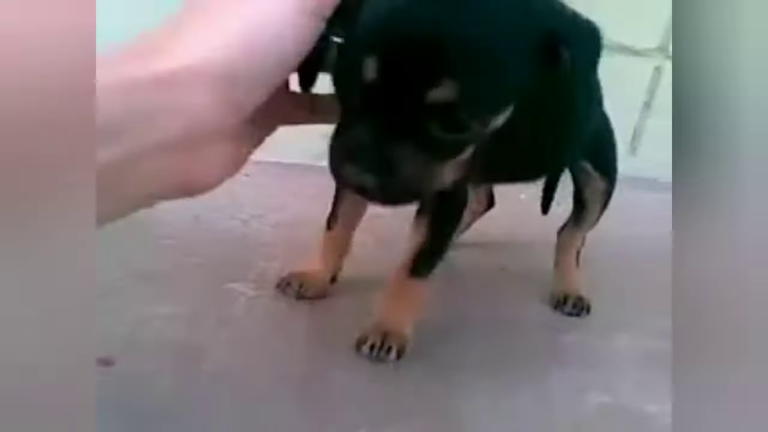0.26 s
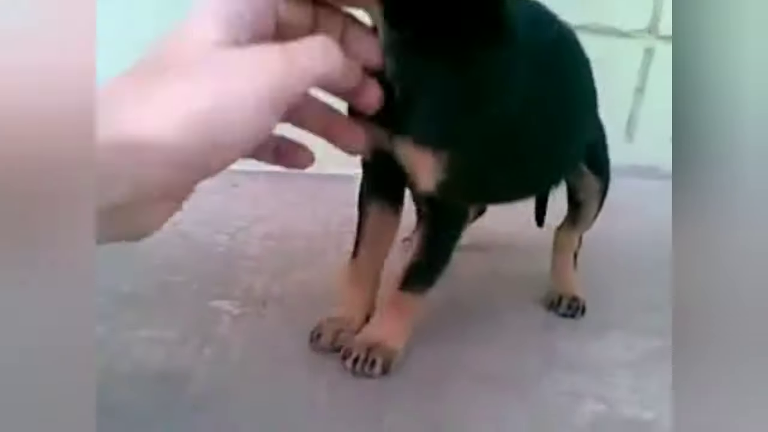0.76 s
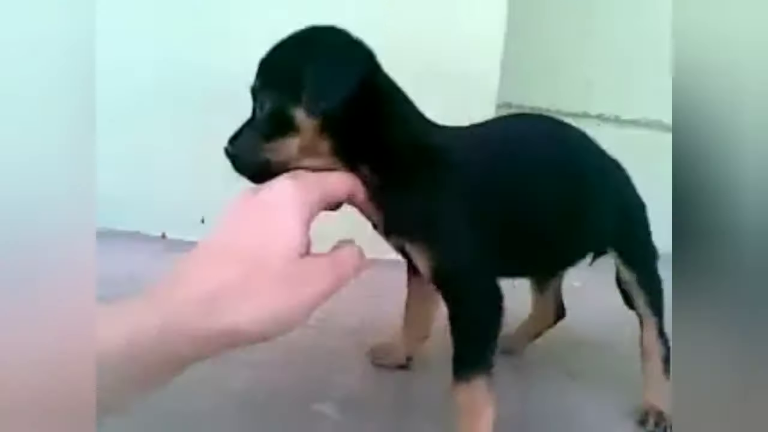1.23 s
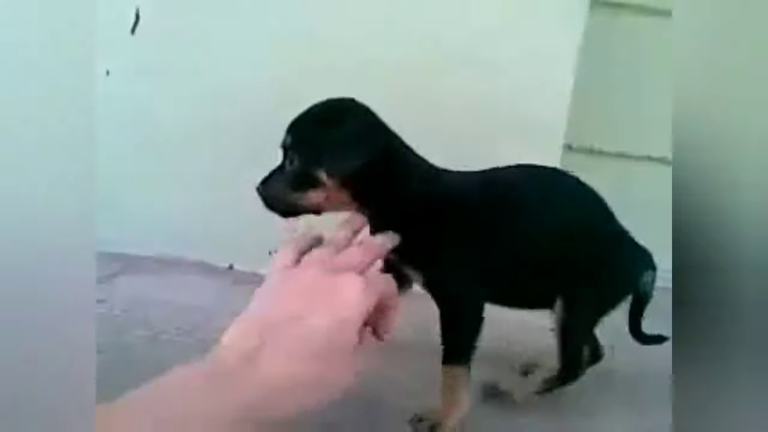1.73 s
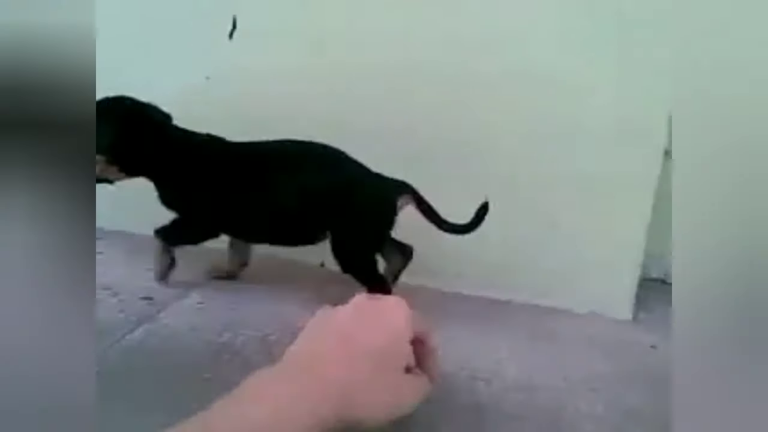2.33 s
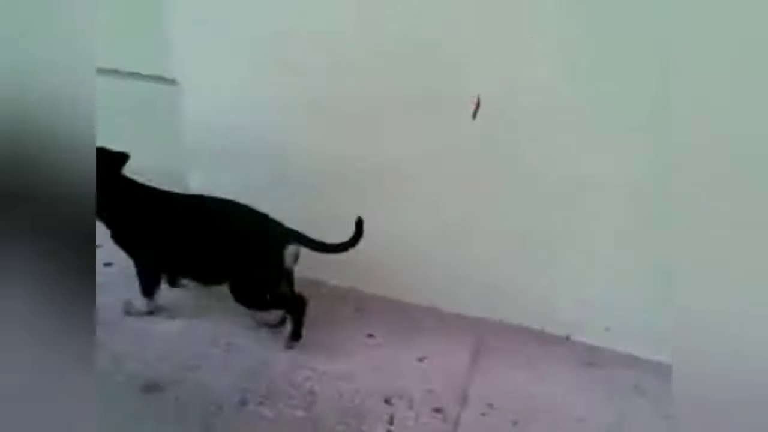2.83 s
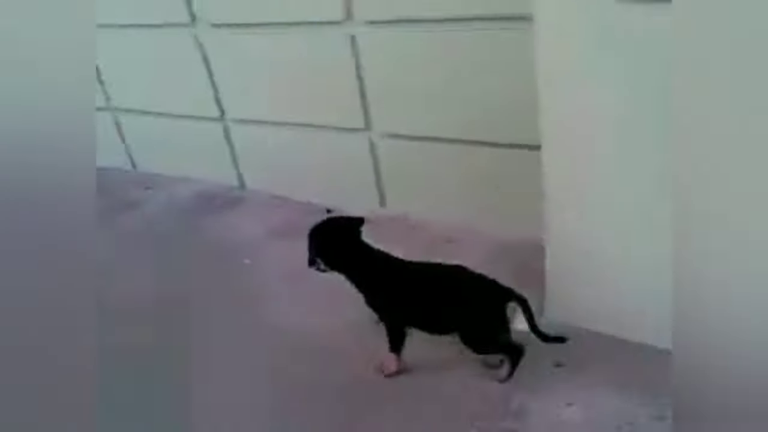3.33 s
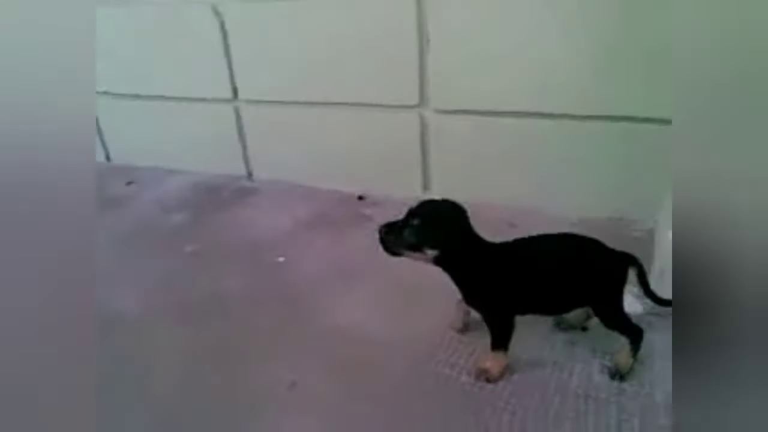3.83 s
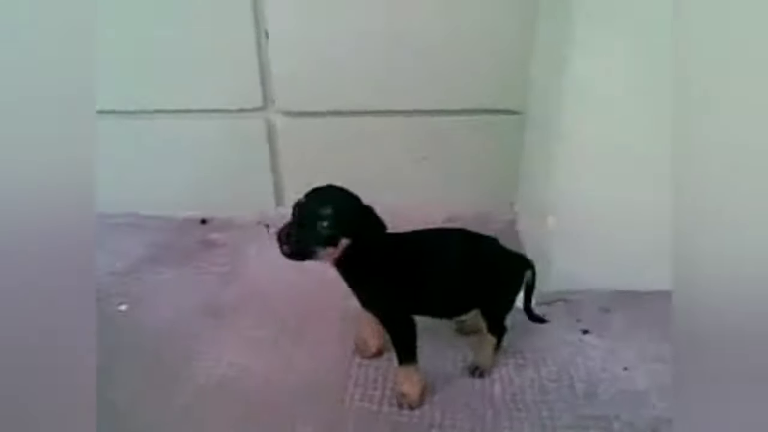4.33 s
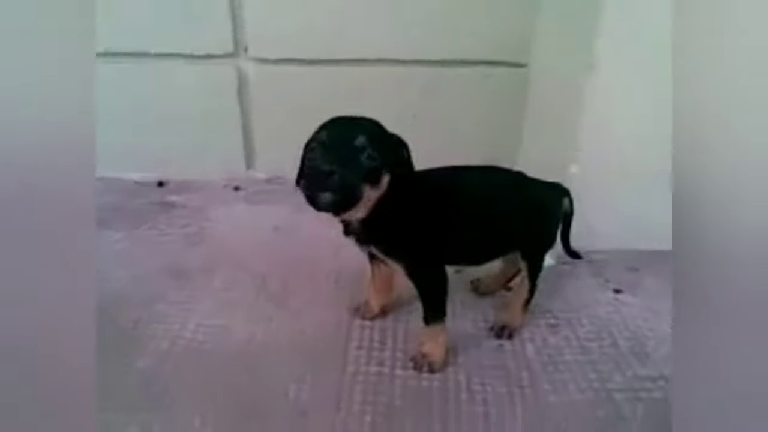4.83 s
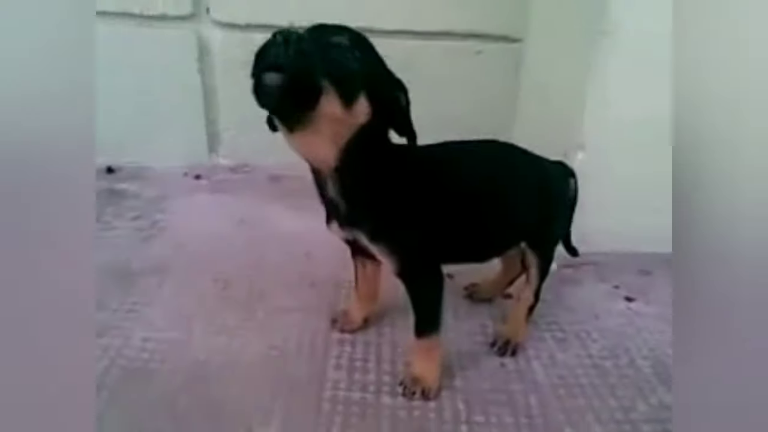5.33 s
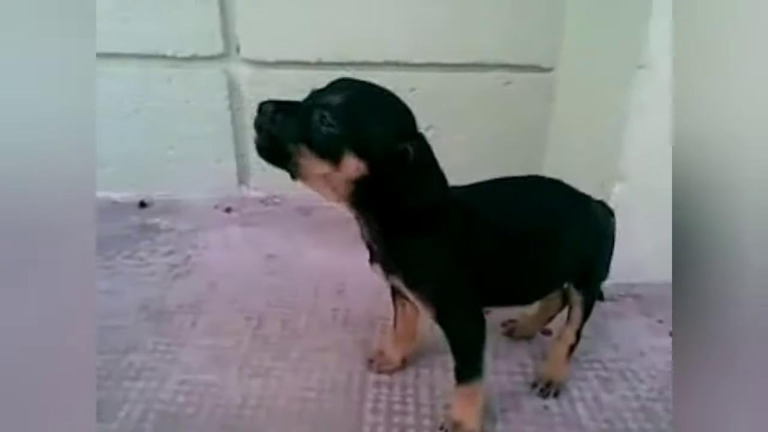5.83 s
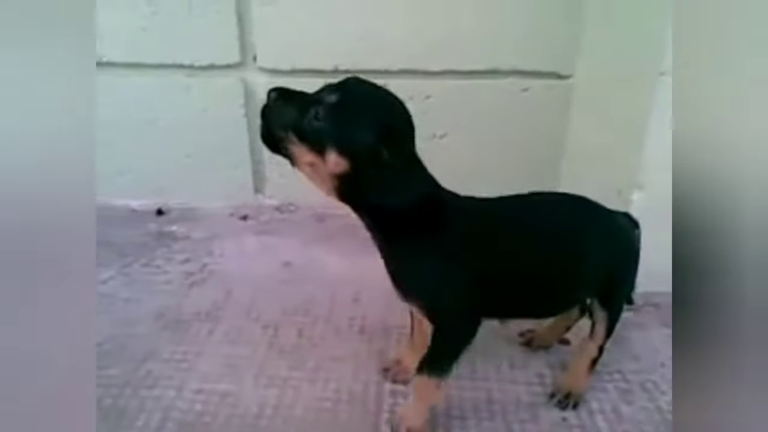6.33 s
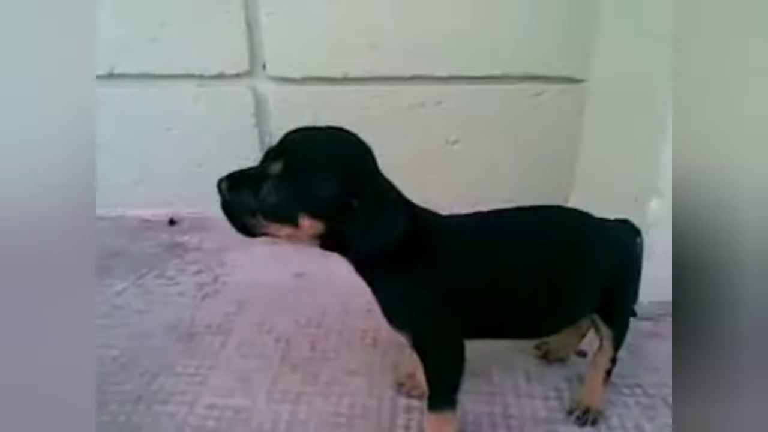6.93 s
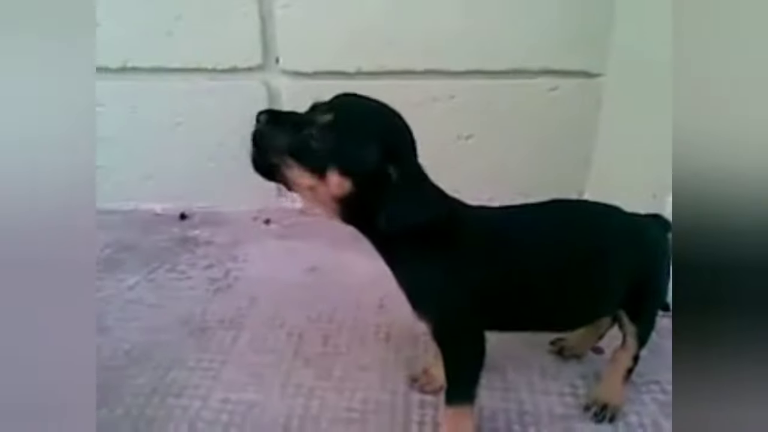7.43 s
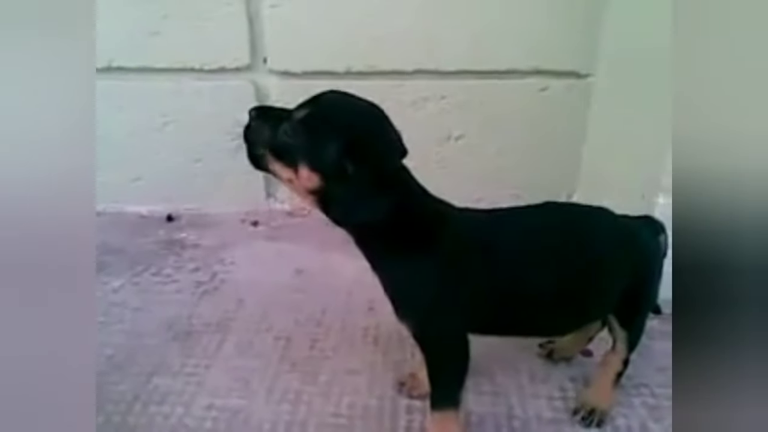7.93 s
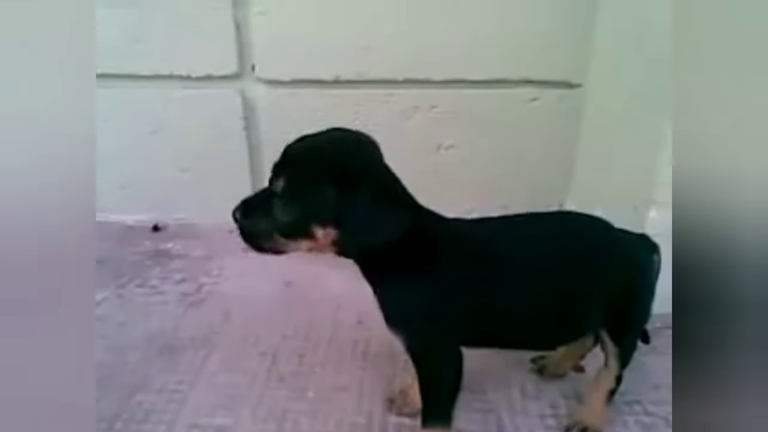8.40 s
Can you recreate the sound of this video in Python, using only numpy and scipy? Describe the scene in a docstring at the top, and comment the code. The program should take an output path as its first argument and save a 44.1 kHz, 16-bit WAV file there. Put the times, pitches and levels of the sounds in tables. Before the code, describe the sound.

A puppy a step away, by a wall, gives short, high whines and small whimpers. It yelps twice, then holds three long, whistle-like whines that sink slowly in pitch, and ends with a whimper and a shorter whine. A few faint taps and scuffs come around the yelps. Other dogs bark hoarsely far off in the echoing building throughout, over a low rumble and a motor's hum.

```python
"""Over a low rumble and a motor's hum, a puppy whines on a concrete floor by a wall, a step away.
It goes on to whimper, yelp and hold long notes: its vocal folds give a thin, nearly pure whistle,
and its muzzle colours a faint sheen of high overtones. Other dogs bark far off in the echoing
building. There are short taps and scuffs, a mouth click, and a hand rubbing the fur under its chin."""
import sys
import numpy as np
from scipy import signal
from scipy.fft import rfft, irfft, next_fast_len
from scipy.io import wavfile
from scipy.ndimage import uniform_filter1d, map_coordinates

SR = 44100
rng = np.random.default_rng(int(sys.argv[2]) if len(sys.argv) > 2 else 0)


def unload_wav(signal):
    """Save mono or channel-first audio to the path in sys.argv[1] as 16-bit WAV at rate SR, clipped to [-1, 1]."""
    wavfile.write(
        sys.argv[1],
        SR,
        np.round(np.clip(np.atleast_2d(signal).T, -1, 1) * 32767).astype(np.int16),
    )


N = 381906
TOP_HZ = 10900  # upper band limit

# level of the background hiss and hum, which sinks during the long whines: t/s, level/dB
BACKGROUND_LEVEL = [(0, -42.5), (1.1, -45), (1.35, -42), (2.9, -43.5), (4.5, -47), (5.7, -48), (6.7, -45),
                    (8.1, -47), (8.66, -43.5)]
# mouth resonances that the third harmonic slides through: f/Hz, gain/dB
THIRD_FORMANTS = [(2000, -11), (2150, -13.5), (2270, -9.5), (2430, -23), (2620, -15.5), (2670, -8.5),
                  (2725, -25.5), (3100, -29), (3260, -20), (3600, -26.5)]


def amp(db):
    """Amplitude ratio of a level in decibels."""
    return 10 ** (np.asarray(db) / 20)


def unit(x):
    """Normalisation to an rms of 1."""
    return x / np.sqrt(np.mean(x ** 2) + 1e-20)


def along(points, hz):
    """Interpolation of (f/Hz, value) points on a logarithmic frequency axis."""
    f, v = np.transpose(points)
    return np.interp(np.log(hz + 1), np.log(f), v)


def curve(rows):
    """Linear interpolation of (t/s, value) rows over the whole scene."""
    return np.interp(np.arange(N) / SR, *np.transpose(rows))


def controls(rows):
    """Linear interpolation of each column after t/s, over the span of the rows."""
    s, *columns = np.transpose(rows)
    return [np.interp(np.arange(s[0], s[-1], 1 / SR), s, c) for c in columns]


def wobble(rate, size):
    """Smooth random modulation: a spline through `rate` Gaussian knots a second."""
    knots = rng.standard_normal(int(size * rate / SR) + 4)
    return map_coordinates(knots, [np.arange(size) * rate / SR])


def filtered(x, response):
    """Linear filtering: the spectrum is multiplied by a frequency response."""
    size = x.shape[-1]
    m = next_fast_len(size + SR // 4)
    return irfft(rfft(x, m) * response(np.fft.rfftfreq(m, 1 / SR)), m)[..., :size]


def shaped(x, gains):
    """Spectral shaping by (f/Hz, gain/dB) points."""
    return filtered(x, lambda hz: amp(along(gains, hz)))


def noise(spectrum, size):
    """Coloured noise of rms 1 from (f/Hz, relative density/dB) points."""
    return unit(shaped(rng.standard_normal(size), spectrum))


def add(track, s, sound):
    """Superposition of a sound on the track, starting at s seconds."""
    start = max(round(s * SR), 0)
    part = track[start:start + len(sound)]
    part += sound[:len(part)]


def reverberation(decays):
    """A diffuse tail of energy 1: each band decays exponentially, as given by (f/Hz, T60/s) points."""
    hz, t, bands = signal.stft(rng.standard_normal(SR), SR, nperseg=256)
    decay = 10 ** (-3 * t / along(decays, hz)[:, None])
    tail = signal.istft(bands * decay, SR, nperseg=256)[1]
    return tail / np.linalg.norm(tail)


def background(rumble_gain_db=2):
    """Broadband noise under slow amplitude modulation: a low rumble and a faint hiss."""
    # spectra of the rumble and the hiss: f/Hz, relative density/dB
    rumble_spectrum = [(20, -12.5), (45, -4), (80, 1), (125, -7.5), (170, -16), (260, -17.5), (600, -61.5),
                       (2000, -100)]
    hiss_spectrum = [(100, 6.5), (250, -0.5), (400, 6.5), (550, 3), (800, -0.5), (1200, -6.5),
                     (1900, -11.5), (2600, -16.5), (4000, -22.5), (6500, -35), (9400, -32.5), (10200, -61)]
    # level of the rumble, which sinks during the long whines: t/s, relative level/dB
    rumble_level = [(0, -42), (2.2, -41.5), (3.8, -40.5), (4.8, -44), (6.9, -45.5), (7.3, -43),
                    (8.66, -41.5)]
    rumble = noise(rumble_spectrum, N) * amp(curve(rumble_level) + rumble_gain_db + wobble(4.7, N))
    hiss = noise(hiss_spectrum, N) * amp(curve(BACKGROUND_LEVEL) + 0.22 * wobble(3.6, N))
    return rumble + hiss


def motor(drift_rad=0.86, waver_db=3):
    """A distant motor's line spectrum, each partial modulated at random in amplitude and phase."""
    # partials of the hum: f/Hz, level/dB relative to the hiss
    partials = [(84, -3.5), (175, -13), (352, -7), (434, -19.5), (526, -7), (700, -14), (868, -13.5)]
    t = np.arange(N) / SR
    hum = np.zeros(N)
    for hz, db in partials:
        strength = amp(db + waver_db * wobble(6, N))
        hum += strength * np.sin(2 * np.pi * hz * t + drift_rad * wobble(12, N))
    return hum * amp(curve(BACKGROUND_LEVEL))


def cry(pitch, levels, sheen_db, muzzle, rough, attack_s=0.0025, release_s=0.013):
    """Source and filter: vocal-fold harmonics, clean when held, raspy in glides, most of all upwards."""
    # narrow resonance that catches the fifth harmonic of low notes: f/Hz, level/dB re the fourth
    nasal_formant = [(3350, -21), (3650, 13), (3950, -41), (4300, -22)]
    # breath torn by a sliding voice: f/Hz, relative density/dB
    rasp_spectrum = [(1500, -16.5), (3000, -6), (4500, 4), (7200, 1), (8000, -24), (10000, -40)]
    size = len(pitch)
    t = np.arange(size) / SR
    pitch = uniform_filter1d(pitch, size=400)
    slope = np.gradient(np.log(pitch)) * SR
    glide = np.tanh(uniform_filter1d(np.abs(slope), size=2000) / 2)  # 0 held, 1 sliding fast
    climb = np.tanh(uniform_filter1d(np.maximum(slope, 0), size=800) / 2)
    jitter = (.0012 + .0067 * glide + .009 * rough) * wobble(300, size)
    wander = (.0012 + .003 * glide) * wobble(34.76, size)
    pitch = pitch * (1 + jitter + wander)
    phase = 2 * np.pi * np.cumsum(pitch) / SR

    shimmer_db = (0.52 + 3 * rough) * wobble(110.94, size)
    core = np.zeros(size)
    for k, db in enumerate(levels, 1):
        waver_db = 1.21 * np.sqrt(k) * (1 + glide) * wobble(25, size)
        core += amp(db + shimmer_db + waver_db) * np.sin(k * phase)
    core += amp(levels[3] + along(nasal_formant, 5 * pitch)) * np.sin(5 * phase)

    # overtones above 8 kHz are turned down on the highest cries
    top_cut = np.clip((pitch.max() - 1150) / 150, 0, 1)
    overtones = np.zeros(size)
    for k in range(5, 15):  # the sheen: weak overtones slide through the muzzle's resonances
        colour_db = muzzle(k * pitch) + top_cut * along([(7500, 0.015), (8100, -17)], k * pitch)
        flutter_db = (1 + 4 * glide) * wobble(70, size)
        scatter_rad = 2 * rough * wobble(450, size)
        overtones += amp(colour_db + flutter_db) * np.sin(k * phase + scatter_rad)
    sheen = amp(sheen_db + 4 * (1 - glide) - 3) * unit(overtones)

    # on a held, strained note, faint fuzzy tones sound at thirds between the harmonics
    strain = amp(levels[1]) * (1 - glide) * np.clip((pitch - 830) / 70, 0, 1)
    between = sum(amp(db) * np.sin(ratio * phase + 0.9 * wobble(110, size))
                  for ratio, db in [(5 / 3, 7), (7 / 3, -3), (8 / 3, 1)])
    haze = noise([(700, -19.5), (1650, 16.5), (2500, -16.5), (3500, -30.5), (9000, -46.5)], size)
    haze *= amp(-32) * np.hypot(amp(levels[0]), amp(levels[1]))
    rasp = noise(rasp_spectrum, size) * (1 + np.cos(phase))  # pulsed once a period
    rasp *= amp(sheen_db - 19 + 3 * climb + 12 * rough) * glide
    voice = np.sqrt(2) * (core + amp(-22) * strain * between) + sheen + haze + rasp
    fade = np.clip(np.minimum(t / attack_s, (t[-1] - t) / release_s), 0, 1)
    return voice * np.sin(fade * np.pi / 2) ** 2


def shut_cry(pitch, first_db, second_re_first_db, sheen_db, rough):
    """Filtering by a nearly shut mouth: the fundamental leads; high notes reach the muzzle formants."""
    # resonances met by the second harmonic, and by the higher overtones: f/Hz, gain/dB
    second_formants = [(1350, -4), (1600, 5.5), (1780, 4.5), (2000, -2), (3000, -10)]
    shut_formants = [(3300, -2), (3700, -3), (4150, 3), (4500, 6.5), (4800, 7.5), (5300, 3), (6000, 5),
                     (6700, 1), (7300, 4.5), (8200, -11), (9200, 3), (10000, -38)]
    muzzle = lambda hz: along(shut_formants, hz)
    shrill_db = lambda k: sheen_db - 6.5 + muzzle(k * pitch)
    second_db = first_db + second_re_first_db + along(second_formants, 2 * pitch)
    third_db = np.maximum(shrill_db(3), first_db - 16 + along(THIRD_FORMANTS, 3 * pitch))
    fourth_db = shrill_db(4) - 5
    return cry(pitch, [first_db, second_db, third_db, fourth_db], sheen_db, muzzle, rough)


def short_whines_and_yelps():
    """Frequency modulation of the shut-mouthed voice: two whines waver, then two yelps leap and fall."""
    # one contour a cry, before the formants: t/s, f/Hz, level/dB, second harmonic/dB re first, sheen/dB
    contours = [
        [(0.034, 1056, -39, -20, -75), (0.047, 938, -33, -30, -62), (0.07, 939, -30, -21, -68),
         (0.092, 967, -33, -20, -62), (0.125, 938, -33.5, -18.5, -58), (0.155, 881, -31.5, -13.5, -60),
         (0.205, 868, -32.5, -15, -57), (0.234, 887, -32, -21, -56), (0.25, 820, -44, -25, -63)],
        [(0.668, 698, -34, -27, -69), (0.69, 686, -32, -28, -63), (0.725, 665, -30, -30, -66),
         (0.748, 739, -28, -29, -69), (0.785, 694, -28, -24, -65), (0.85, 688.6, -28.5, -36, -64),
         (0.89, 665, -30.5, -32, -57.5), (0.935, 658, -43, -22, -77)],
        [(3.012, 1146, -58, 0, -56), (3.035, 1236, -41, -3, -55.5), (3.062, 1479, -28.5, -11, -47),
         (3.09, 1438, -33.5, -12, -47.5), (3.125, 1300, -44, -15, -59.5), (3.16, 1217, -42, -23, -60.5),
         (3.25, 1089, -40.5, -26, -60), (3.29, 1070, -47, -10, -69)],
        [(3.428, 1014, -40.5, -13, -58), (3.447, 1120, -34, -11.5, -51.5), (3.476, 1360, -22, -9, -39.5),
         (3.505, 1520, -32.5, -23, -48), (3.55, 1403, -34, -11, -48), (3.59, 1307, -36.5, -10, -58),
         (3.625, 1196, -41.5, -13, -51.5), (3.645, 1146, -45, -16, -56), (3.69, 1080, -38.5, -21, -66),
         (3.778, 1026, -42, -20, -65)],
    ]
    track = np.zeros(N)
    for rows, rough in zip(contours, [.15, .55, .25, .2]):
        add(track, rows[0][0], shut_cry(*controls(rows), rough))
    return track


def far_dogs(rough=0.83, pitch_arch=0.149, hoot_width=.25):
    """Pulses and noise excite a mouth resonance; the hoarse barks arrive mostly as reverberation."""
    # t/s, duration/s, level/dB, pitch f/Hz, resonance f/Hz, its relative bandwidth, brightness/dB
    barks = [ (0.431, 0.15, -33.5, 327.5, 594, 0.56, -12.5), (0.53, 0.2, -38, 348, 383, 0.53, -33),
             (2.026, 0.22, -30, 238.5, 472, 0.29, -20), (2.038, 0.084, -36.5, 296.3, 703, 0.21, -22),
             (3.712, 0.1, -29.5, 351.3, 700, 0.41, -9), (3.781, 0.097, -32.5, 401, 840, 0.79, -6),
             (4.634, 0.1, -33.5, 417.7, 932, 0.52, -8.5), (4.63, 0.1, -32, 343, 386, 0.45, -36),
             (4.729, 0.096, -30, 415.2, 427, 0.082, -31.5), (5.229, 0.035, -44, 294, 303, 0.35, -23),
             (5.858, 0.2, -36.5, 292.7, 548, 0.76, -13), (6.112, 0.12, -37.5, 317, 606, 0.68, -14),
             (6.323, 0.072, -27, 453.6, 1030, 0.4, 5.5), (6.701, 0.13, -39, 380, 423, 0.27, -7),
             (7.323, 0.081, -26, 392, 810, 0.34, -5.5), (7.53, 0.12, -25, 339.6, 643, 0.47, -9.5),
             (7.579, 0.051, -36.5, 364, 1050, 0.14, -11), (8.172, 0.091, -27, 448.5, 897, 0.58, -15),
             (8.359, 0.12, -37.5, 387, 696, 0.46, -10), ]
    # colour of a bark beside its main resonance: f/Hz, gain/dB
    bark_colour = [(150, -43), (400, -18.5), (900, -6), (1400, -10.5), (2100, -23), (2800, -26),
                   (4000, -27), (7000, -48), (10000, -73.5)]
    # reverberation time of the building: f/Hz, T60/s
    hall_decay = [(200, 1.09), (800, 1.37), (2500, 1.22), (8000, 0.13)]
    # treble lost on the way: f/Hz, gain/dB
    path_loss = [(2200, -2), (3300, -13.5), (7000, -3.5), (10000, -40)]
    track = np.zeros(N)
    for s, length, db, pitch, mouth_hz, width, bright_db in barks:
        size = int(length * SR)
        swell = np.abs(np.sin(np.pi * (np.arange(size) / size) ** 0.97)) ** 0.605
        contour = pitch * (1 + pitch_arch * (swell - .8) + .03 * wobble(150, size))
        phase = 2 * np.pi * np.cumsum(contour) / SR
        pulses = unit(sum(np.cos(k * phase) for k in range(1, 41)))
        hoot = max(1 - width / hoot_width, 0)  # a narrow resonance clears the bark into a hoot
        hoarse = rough * (1 - hoot)
        throat = swell * ((1 - hoarse) * pulses + hoarse * rng.standard_normal(size))
        damping = lambda hz: 1j * hz * width * mouth_hz
        resonance = lambda hz: damping(hz) / (mouth_hz ** 2 - hz ** 2 + damping(hz))
        tract = lambda hz: resonance(hz) ** 2 + 1j * amp(bright_db + along(bark_colour, hz))
        bark = filtered(np.pad(throat, (0, SR // 20)), tract)
        hall = reverberation(hall_decay)
        hall[0] += amp(-5 + 12 * hoot)  # the direct path, stronger for a hoot
        heard = signal.fftconvolve(bark, hall)
        rms = np.sqrt(np.sum(heard ** 2) / (size + SR / 10))
        add(track, s, amp(db) * heard / rms)
    return shaped(track, path_loss)


def taps_and_click(t60_s=0.1, gain_db=-12):
    """Exponentially damped noise: short taps and scuffs, and a mouth click as the second yelp starts."""
    # taps and scuffs, then the mouth click: t/s, relative level/dB
    bursts = [(0.94, -36.5), (3.307, -33.5), (3.326, -32), (3.344, -31.5), (3.428, -36)]
    track, t = np.zeros(N), np.arange(SR // 10) / SR
    for s, db in bursts:
        burst = noise([(500, -27.5), (1600, 10), (2500, -9.5), (7000, -18), (10000, -18.5)], len(t))
        add(track, s, amp(db + gain_db) * burst * 10 ** (-3 * t / t60_s))
    return track


def fur_stroke(start_s=0.98, length_s=0.55, level_db=-63.5):
    """Friction of fingers in short fur: one soft, uneven swell of noise."""
    # spectrum of the rustle: f/Hz, relative density/dB
    fur_spectrum = [(900, -17.5), (1600, -6), (2050, 4.5), (2700, -14.5), (6000, -27)]
    track, size = np.zeros(N), int(length_s * SR)
    rustle = noise(fur_spectrum, size) * np.hanning(size)
    add(track, start_s, rustle * amp(level_db + 3 * wobble(23, size)))
    return track


def whimpers(swell_s=0.018, fade_s=0.028, sheen_db_per_octave=11):
    """Frequency modulation: short whimpers rise and fall in pitch, some swelling at the top."""
    # t/s, rise/s, fall/s, start f/Hz, top f/Hz, end f/Hz, sag (1 straight, more drops early),
    # level/dB, accent/dB, second harmonic/dB re first, sheen/dB (both before formants), roughness 0-1
    arches = [ (1.655, 0.056, 0.036, 625, 845, 745, 1.1, -46.5, 8.5, -11, -66, .5),
              (2.003, 0.059, 0.1, 840, 1106, 974, 1.2, -45.5, 4, -11.5, -63, .6),
              (2.38, 0.036, 0.053, 877, 1052, 904, 1.5, -51, 3.5, -5, -66.5, 0.58),
              (2.703, 0.042, 0.11, 1148, 1353, 1024, 1.3, -45, -3, -15, -58.5, 0.35),
              (4.939, 0.075, .14, 993, 1152, 906, 1.9, -52, 0.5, -2.5, -61.5, 0.67),
              (7.747, 0.048, 0.16, 960, 1026, 760, 2.4, -41, 0, -5, -62.5, 0.24), ]
    track = np.zeros(N)
    for s, rise, fall, start_hz, top_hz, end_hz, sag, db, accent_db, second_db, sheen_db, rough in arches:
        t = np.arange(int((rise + fall) * SR)) / SR
        past_top = t - rise
        up = np.sin(np.clip(t / rise, 0, 1) * np.pi / 2) ** 1.5
        down = 1 - (1 - np.clip(past_top / fall, 0, 1)) ** sag
        pitch = start_hz + (top_hz - start_hz) * up - (top_hz - end_hz) * down
        accent = accent_db * np.exp(-(past_top / np.where(past_top < 0, swell_s, fade_s)) ** 2)
        sheen = sheen_db + 0.63 * accent + sheen_db_per_octave * np.log2(pitch / top_hz)
        add(track, s, shut_cry(pitch, db + accent, second_db, sheen, rough))
    return track


def long_whines(wide_open_db=11, full_squeal_db=-42, full_sheen_db=-44):
    """Vocal-tract resonance on held notes: opening the mouth shifts power to the second harmonic."""
    # one contour a whine: t/s, f/Hz, level/dB, opening (second harmonic/dB re first), relative sheen/dB
    contours = [
        [(3.768, 1041, -43, -21, -56.5), (3.793, 1068, -29, -19.5, -59), (3.825, 1035, -22.5, -19, -52.5),
         (3.895, 1028, -33.5, -1.5, -60), (3.99, 1012, -26, -9.5, -59), (4.07, 1025, -25, -17.5, -60),
         (4.14, 1020, -26, -15.5, -62.5), (4.22, 1002, -24, -13, -59.5), (4.34, 990.7, -24, -17, -57.5),
         (4.40, 990, -25, -12.5, -59.5), (4.56, 969, -24.5, -14.5, -62.5), (4.65, 951, -27.5, -11, -69),
         (4.70, 937, -28.5, -10, -70), (4.765, 928, -39, -7, -71.5)],
        [(5.125, 927, -47.5, -6, -71), (5.16, 902, -38, -9.5, -75), (5.185, 943, -31, 0, -72),
         (5.245, 940, -29.5, -0.5, -72), (5.26, 927.5, -28.5, 3.5, -65), (5.28, 948, -28.5, 0, -69),
         (5.39, 932, -26, -3, -74), (5.46, 912.5, -28, 4, -74), (5.56, 920.6, -28.5, -0.5, -75.5),
         (5.69, 915, -30.5, 3, -75), (5.735, 902, -36.5, 11, -80), (5.765, 914, -36, -14.5, -82),
         (5.80, 877, -68, 11, -83)],
        [(5.96, 884, -56.5, -10, -68), (5.99, 986, -43.5, 8, -46), (6.02, 1118, -36.5, -2, -44.5),
         (6.06, 1104, -34, 15, -46.5), (6.08, 1070, -26, 12, -52), (6.115, 1004, -37.5, 9.5, -67),
         (6.2, 967, -30, 11.5, -65), (6.356, 935, -27.5, 4, -72), (6.505, 890, -24, 9, -61),
         (6.522, 830, -26, 15, -77), (6.56, 821, -21.5, 12, -65), (6.615, 806, -28.5, 0.5, -70.5),
         (6.655, 801, -28.5, 10, -75), (6.725, 816, -30.5, 0, -67.5), (6.84, 801, -30.5, 3.5, -73.5),
         (6.98, 801.2, -30, 4.5, -72.5), (7.072, 777, -35.5, 9, -75), (7.155, 741, -35.5, -3, -70),
         (7.185, 707, -41.5, -5, -79), (7.215, 669, -38.5, -12, -82)],
        [(8.26, 913, -42, 0, -60), (8.3, 1048, -44, 4, -57), (8.394, 933, -36.5, 18, -55),
         (8.456, 907, -35, 20, -59), (8.53, 979, -38, 6, -53.5), (8.585, 1017, -37, 4.5, -58),
         (8.603, 937, -40, 7, -56), (8.622, 900, -34, 14, -61)],
    ]
    # resonances met by the fourth harmonic, and by the higher overtones: f/Hz, gain/dB
    fourth_formants = [(2800, -29), (3040, -19), (3120, -5), (3190, -12.5), (3220, -29.5), (3260, -30.5),
                       (3700, -43), (4150, -56)]
    open_formants = [(3300, -5), (3700, 1), (4000, -2.5), (4500, 1.5), (4850, -1.5), (5150, 4), (5650, 5.5),
                     (6100, 13.5), (6600, 11), (7100, -3.5), (8100, 0.5), (9100, 5.5), (10000, -41)]
    # change of the overtones in the low register: f/Hz, gain/dB
    low_register = [(4000, 5), (4830, 10.5), (5650, 0), (6450, 1.5), (7200, -0.5), (8100, -4.5),
                    (8800, -9.5)]
    track = np.zeros(N)
    for rows, rough in zip(contours, [0, .13, .15, .22]):
        pitch, level, opening, sheen = controls(rows)
        first = level - 10 * np.log10(1 + amp(opening) ** 2)
        third = level + along(THIRD_FORMANTS, 3 * pitch) - np.maximum(opening - wide_open_db, 0)
        squeal = full_squeal_db + 2.4 * (sheen - full_sheen_db)  # strain lifts the fourth harmonic
        fourth = np.maximum(level + along(fourth_formants, 4 * pitch), squeal)
        low = np.clip((870 - pitch) / 40, 0, 1)
        muzzle = lambda hz: along(open_formants, hz) + low * along(low_register, hz)
        add(track, rows[0][0], cry(pitch, [first, first + opening, third, fourth], sheen, muzzle, rough))
    return track


def near_walls(voice):
    """Reflection from nearby walls adds a faint, short tail to the direct sound."""
    # reverberation time by the wall: f/Hz, T60/s
    corner_decay = [(300, 0.097), (2000, 0.38), (9000, 0.014)]
    reflections = signal.fftconvolve(voice, reverberation(corner_decay))[:N]
    return voice + shaped(reflections, [(2000, -20), (5000, -17)])


def scene(spread_t60_s=.03):
    """Mid-side stereo: all sources sit in the centre, and a decorrelated side signal widens the treble."""
    # side signal relative to the mid: f/Hz, gain/dB
    side_gain = [(2300, -71.5), (3400, -22), (5000, -4), (9000, -16.5)]
    puppy = near_walls(whimpers() + short_whines_and_yelps() + long_whines())
    mid = puppy + far_dogs() + taps_and_click() + fur_stroke() + background() + motor()
    diffuse = signal.fftconvolve(mid, reverberation([(TOP_HZ, spread_t60_s)]))[:N]
    side = shaped(diffuse, side_gain)
    return np.array([mid + side, mid - side])


def record(dry):
    """An ideal low-pass filter removes everything above the band limit."""
    return filtered(dry, lambda hz: hz < TOP_HZ)


dry = scene()
out = record(dry)
unload_wav(out)
```